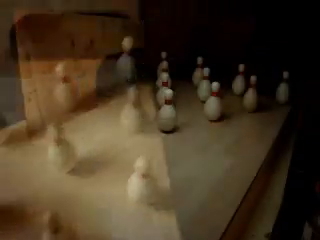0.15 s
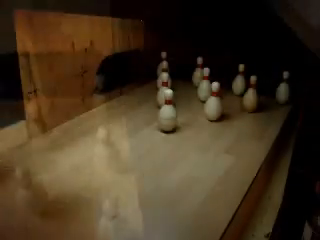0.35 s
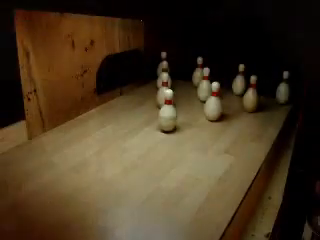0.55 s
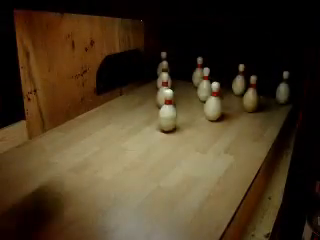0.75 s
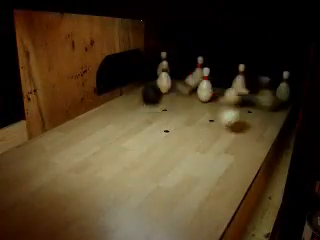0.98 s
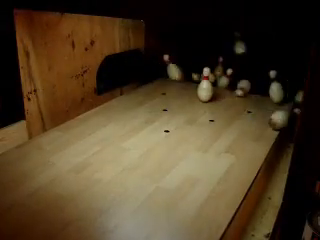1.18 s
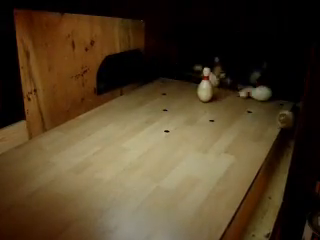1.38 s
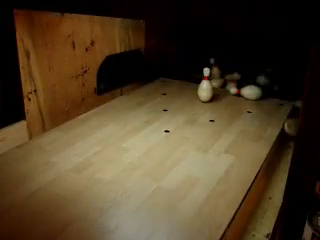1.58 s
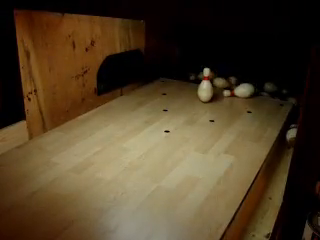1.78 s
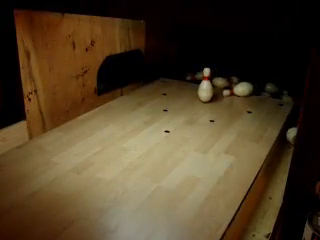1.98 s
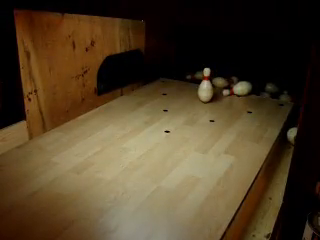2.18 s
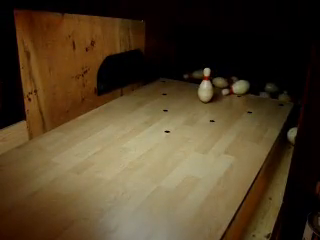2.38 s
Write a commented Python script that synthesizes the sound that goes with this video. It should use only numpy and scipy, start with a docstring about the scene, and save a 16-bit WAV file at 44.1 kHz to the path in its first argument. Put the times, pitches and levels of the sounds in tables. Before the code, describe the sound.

A bowling ball drops onto a wooden lane at about 0.25 seconds with a loud, slightly distorted thud and a small bounce. It rumbles along the boards with a skidding hiss and a few knocks. At about 1 second it smacks into the pins, which ring briefly, clatter and tumble until around 1.9 seconds. One last knock follows near 2.1 seconds, leaving faint room noise.

```python
"""In a quiet basement, a bowling ball drops on a wooden lane, hard enough to overload the microphone,
and rumbles down the boards as dense tiny contacts with the grain excite the wood. It smacks into the
pins, which ring in their damped modes, clatter and tumble; single pins then crack against each other
and thump on the deck and side walls. Heavy blows shake the whole lane, and the room reverberates."""
import sys
import numpy as np
from scipy import signal
from scipy.fft import rfft, irfft
from scipy.io import wavfile

SR = 44100
rng = np.random.default_rng(int(sys.argv[2]) if len(sys.argv) > 2 else 0)


def master_out(mix):
    """Clip the mix to full scale and print it as 16-bit PCM to the path in sys.argv[1]."""
    frames = np.transpose(np.atleast_2d(mix))
    ceiling = np.clip(frames, -1, 1)
    pcm = np.round(ceiling * 32767).astype(np.int16)
    wavfile.write(sys.argv[1], SR, pcm)


N = 108045
TIME = np.arange(N) / SR
BLOW_SAMPLES = 32768


def from_db(db):
    """Amplitude grows tenfold for every 20 decibels."""
    return 10 ** (np.asarray(db) / 20)


def unit_power(x):
    """Dividing by the root mean square gives unit power."""
    return x / np.sqrt(np.mean(x ** 2) + 1e-20)


def decay(t60_s):
    """Damping makes amplitude fall exponentially, 60 dB in t60_s."""
    return from_db(-60 * np.minimum(TIME[:BLOW_SAMPLES] / t60_s, 4))


def delayed(x, start_s):
    """A pure delay places a sound in the scene."""
    return np.pad(x, (max(int(start_s * SR), 0), N))[:N]


def envelope(curve):
    """An amplitude envelope follows a decibel curve, silent outside it."""
    return from_db(np.interp(TIME, *np.transpose(curve), left=-120, right=-120))


def coloured(x, spectrum, pitch=1, taps=8192):
    """A minimum-phase filter of unit power gain imposes a spectrum; pitch scales its frequencies."""
    hz, db = np.transpose(spectrum)
    bin_hz = np.arange(taps // 2 + 1) * SR / taps
    gain = unit_power(from_db(np.interp(np.log(bin_hz + 1), np.log(hz * pitch), db)))
    cepstrum = irfft(np.log(gain))
    cepstrum[1:taps // 2] *= 2  # folding onto positive time makes the filter causal
    cepstrum[taps // 2 + 1:] = 0
    response = irfft(np.exp(rfft(cepstrum)))
    return signal.fftconvolve(x, response)[:len(x)]


def basement(air_db=-51.5, hum_db=-64.5, hum_hz=57.4):
    """The noise floor is faint broadband air noise plus a low pure hum."""
    # air noise spectrum: frequency_hz, relative_db
    air_colour = [(30, -13), (60, -3), (100, -11), (200, -9), (450, -4), (900, -2), (2000, -13.5),
                  (4200, -15), (9000, -21), (12000, -31)]
    air = from_db(air_db) * coloured(rng.standard_normal(N), air_colour)
    return air + from_db(hum_db) * np.sin(2 * np.pi * hum_hz * TIME)


def room_tail(t60_s=0.41, build_s=0.0029, grain_db=5, merge_s=0.056):
    """In the room's impulse response, separate echoes merge into a diffuse decay."""
    t = TIME[:BLOW_SAMPLES]
    spread = np.log(from_db(grain_db)) * np.exp(-t / merge_s)
    echoes = rng.standard_normal(BLOW_SAMPLES)
    echoes *= np.exp(spread * np.minimum(rng.standard_normal(BLOW_SAMPLES), 2) - spread ** 2)
    return echoes * (1 - np.exp(-t / build_s)) * decay(t60_s)


def reverberation(x):
    """Convolution with a unit-energy room response gives the reflected sound."""
    tail = room_tail()
    return signal.fftconvolve(x, tail / np.linalg.norm(tail))[:len(x)]


def transients(events, burst_t60_s=0.013, click_share=0.41):
    """Impulsive excitation: a click, a brief noise burst and the room's echoes, in three bands."""
    # low, middle and high spectra: frequency_hz, relative_db
    thud = [(25, -28), (70, -26.5), (120, -14.5), (190, -9), (320, 1), (480, 1.5), (750, -2.5), (1100, -9),
            (2200, -33.5), (8000, -67)]
    knock = [(100, -32.5), (500, -11), (950, 1), (1400, 0.5), (1900, -3.5), (2600, -14.5), (4500, -33.5),
             (12000, -32.5)]
    crack = [(200, -38), (1200, -15.5), (2100, 7.5), (3000, 3.5), (3800, -0.5), (4700, -9.5), (6800, -16.5),
             (10500, -18.5), (14000, -24)]
    out = np.zeros(N)
    for start_s, thud_db, knock_db, crack_db, direct_db, pitch in events:
        sound = 0
        for colour, db in ((thud, thud_db), (knock, knock_db), (crack, crack_db)):
            burst = rng.standard_normal(BLOW_SAMPLES) * decay(burst_t60_s)
            attack = burst * np.sqrt(1 - click_share)
            attack[0] -= np.linalg.norm(burst) * np.sqrt(click_share)  # the click's share of energy
            direct = 2 * from_db(direct_db) * attack
            sound = sound + from_db(db) * coloured(direct + room_tail(), colour, pitch)
        out += delayed(sound, start_s)
    return out


def hiss_and_clatter():
    """A faint high hiss fades away at the very start; later, impacts on wood radiate transients."""
    # the opening hiss, then the impacts: start_s, thud_db, knock_db, crack_db, direct_db, pitch_ratio
    events = [(.006, -54, -53, -51, -2, 1.6), (.553, -23.5, -23, -28, 3, 1.04),
              (.742, -20.5, -27.5, -26.5, 2, 1.67), (.778, -30, -17, -25.5, 3.5, 1.12),
              (.828, -16, -23, -22, 2, 1.2), (.955, -19, -16.5, -19, 0, 1.15), (.999, -39, -17, -25, 1, 1),
              (1.046, -44, -17, -25, 4, 1.17), (1.079, -40, -22, -15.5, 0, 1.35),
              (1.119, -19, -18.5, -24, 3, 1.31), (1.14, -15.5, -15, -21, 2.5, 1.1),
              (1.19, -24, -17, -19, 5, 0.67), (1.225, -16, -18.5, -38, 2, 0.93),
              (1.278, -13, -15, -15.5, -2.5, 0.97), (1.295, -24, -14, -17, 0, 0.98),
              (1.335, -20, -21, -44, 5, .85), (1.372, -27, -29.5, -24.5, 9.5, 1.05),
              (1.4238, -25.5, -18.5, -28.5, 9, 1.34), (1.4785, -35, -15, -22, 4.5, 1.21),
              (1.5615, -24.5, -22.5, -17.5, 7, 1.2), (1.597, -21, -22.5, -40, 4.5, 0.92),
              (1.678, -18.5, -15, -36, 7.5, .88), (1.696, -14, -23, -38, 1, 1.33),
              (1.7772, -19, -13.5, -30, 6.5, 1.02), (1.803, -13.5, -14.5, -29, 2.5, 0.98),
              (1.83, -21, -20.5, -25, -5, 1.06), (1.862, -19, -28, -28.5, 4.5, 1),
              (1.922, -25, -25.5, -52.5, 5.5, 0.96), (2.1298, -16.5, -20, -35, 3.5, 1.01),
              (2.394, -47, -53, -53, 3, 0.68)]
    return transients(events)


def ball_landing():
    """The falling ball gives up its momentum to the boards in three quick impacts."""
    # contacts with the lane: start_s, thud_db, knock_db, crack_db, direct_db, pitch_ratio
    landings = [(.2445, -13.5, -18, -42, -4.5, 0.88), (.249, -3, -8.5, -20, -1.5, 0.92),
                (.325, -12, -19.5, -25.5, 5, 0.84)]
    return transients(landings)


def overload(x, ceiling):
    """Saturation flattens peaks toward a ceiling and leaves weak sound linear."""
    return x / (1 + (x / ceiling) ** 6) ** (1 / 6)


def lane_booms(t60_s=0.15):
    """Heavy blows drive the whole lane into damped low-frequency vibration."""
    # heavy blows: start_s, level_db
    booms = [(.247, -14.5), (.37, -26), (.61, -35), (.93, -37), (1.0, -38), (1.12, -45), (1.33, -37),
             (1.375, -31), (1.478, -41), (1.56, -40), (1.777, -35)]
    # the lane's response: frequency_hz, relative_db
    boom_colour = [(15, -8), (35, -5), (70, -0.5), (120, 3), (250, -30), (1000, -68)]
    force = sum(from_db(db) * delayed(rng.standard_normal(BLOW_SAMPLES) * decay(t60_s), start_s)
                for start_s, db in booms)
    return coloured(force, boom_colour)


def grain_contacts(rate_per_s=900, spread_db=4.5, room_db=4.5):
    """Random contacts between ball and wood grain form shot noise, which the room reverberates."""
    clicks = (rng.random(N) < rate_per_s / SR) * rng.choice([-1, 1], N)
    clicks = clicks * from_db(spread_db * np.minimum(rng.exponential(1, N), 4))
    return unit_power(clicks + from_db(room_db) * reverberation(clicks))


def ball_rolling():
    """Surface roughness excites a low rumble in the lane and a hiss where the ball skids."""
    # envelopes of rumble and skid: time_s, level_db
    rumble_levels = [(.26, -18), (.40, -18.5), (.50, -21), (.61, -18), (.68, -15.5), (.82, -17),
                     (.93, -18.5), (1.04, -38), (1.15, -27), (1.36, -21.5), (1.46, -26.5), (1.62, -26.5),
                     (1.85, -35), (2.0, -58)]
    skid_levels = [(.26, -32), (.42, -23.5), (.6, -21.5), (.75, -21.5), (.9, -19), (1.0, -16), (1.12, -17),
                   (1.25, -18), (1.4, -43), (1.7, -30), (1.85, -25), (2.0, -58)]
    # their spectra: frequency_hz, relative_db
    rumble_colour = [(25, -25), (60, -22), (120, -11.5), (170, -3), (220, -7.5), (320, 0), (550, 0),
                     (800, -4), (1300, -14.5), (3000, -37)]
    skid_colour = [(200, -17), (900, 1.5), (1700, 1), (2500, -2), (3600, -3), (5000, -10), (7500, -18),
                   (11000, -22.5), (14000, -33)]
    rumble = envelope(rumble_levels) * coloured(grain_contacts(), rumble_colour)
    skid = envelope(skid_levels) * coloured(grain_contacts(), skid_colour)
    return rumble + skid


def ringing(modes, pitch, onset_s=0.039):
    """Free vibration is a sum of damped modes; with its echoes it has unit power over the onset."""
    t = TIME[:BLOW_SAMPLES]
    direct = sum(from_db(db) * decay(t60_s) * np.sin(2 * np.pi * hz * pitch * t)
                 for hz, db, t60_s in modes)
    sound = direct + reverberation(direct)
    return sound / np.sqrt(np.mean(sound[:int(onset_s * SR)] ** 2))


def boards_ringing(t60_s=0.069):
    """Single boards resonate in one mode each as the ball crosses them."""
    # board resonances: start_s, nominal_hz, level_db
    boards = [(.30, 401, -15.5), (.37, 304, -13), (.42, 327, -21), (0.609, 169.6, -26.5), (.655, 350, -19),
              (.66, 526, -16.5), (.69, 453, -22), (.742, 577, -14.5), (.79, 410, -20), (.80, 707, -17),
              (.855, 442, -19.5)]
    return sum(from_db(db) * delayed(ringing([(hz, 0, t60_s)], pitch=0.99), start_s)
               for start_s, hz, db in boards)


def pins_ringing():
    """Square hits excite the normal modes of belly and neck, each pin at its own pitch."""
    # square hits: start_s, belly_db, neck_db, pitch_ratio
    hits = [(1.0, -12, -17, 1.08), (1.04, -11, -20, 1.03), (1.057, -29, -18, 0.98), (1.076, -20, -17, 1.0),
            (1.106, -36, -24, 0.79), (1.826, -30, -24, 1.02)]
    # modes of a pin: nominal_hz, relative_db, t60_s
    belly_modes = [(1014, -11, 0.074), (1188, 0, 0.038), (1407, -2, 0.034), (1560, -13.5, 0.033)]
    neck_modes = [(2540, -26, .05), (2950, -4, 0.093), (3030, -3.5, 0.094), (3081, -0.5, 0.069),
                  (4440, -8, 0.041), (5860, -17, .04), (9020, -17, .05)]
    out = np.zeros(N)
    for start_s, belly_db, neck_db, pitch in hits:
        belly = from_db(belly_db) * ringing(belly_modes, pitch)
        neck = from_db(neck_db) * ringing(neck_modes, pitch)
        out += delayed(belly + neck, start_s)
    return out


def scene():
    """The near ball, flattened by overload, adds by superposition to the lane, far pins and room."""
    ball = overload(ball_landing() + ball_rolling() + boards_ringing(), ceiling=0.52)
    return (ball + hiss_and_clatter() + lane_booms() + pins_ringing() + basement())[None]


def record(dry, low_cut_hz=30, high_cut_hz=11900):
    """Band limiting and saturation: deep bass rolls off, sharp peaks clip and the top is cut."""
    high_pass = signal.butter(2, low_cut_hz, "high", fs=SR, output="sos")
    low_pass = signal.ellip(10, .2, 70, high_cut_hz, fs=SR, output="sos")
    clipped = overload(signal.sosfilt(high_pass, dry), ceiling=0.8)
    return signal.sosfilt(low_pass, clipped)


dry = scene()
out = record(dry)
master_out(out)
```